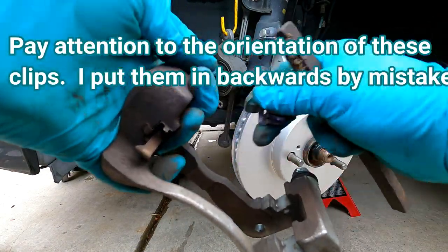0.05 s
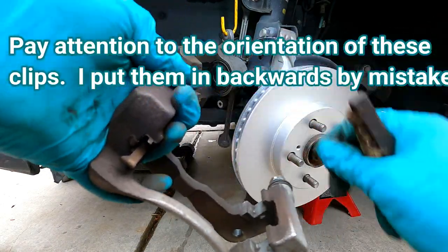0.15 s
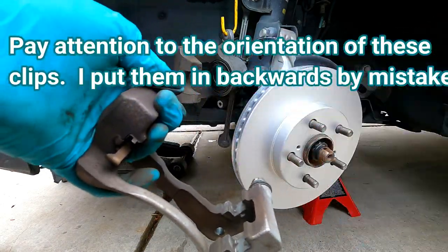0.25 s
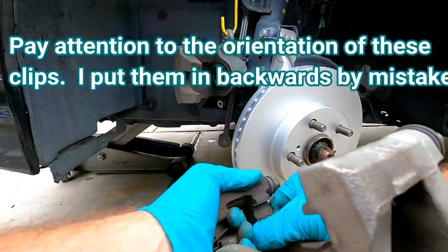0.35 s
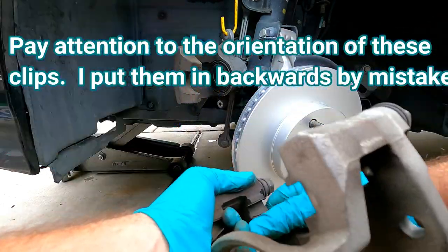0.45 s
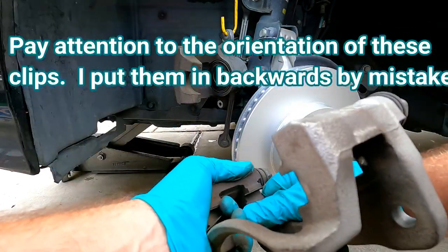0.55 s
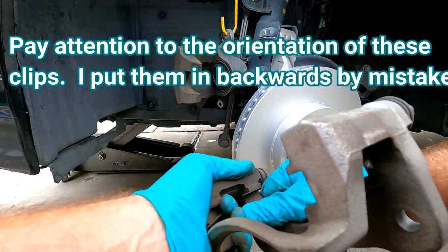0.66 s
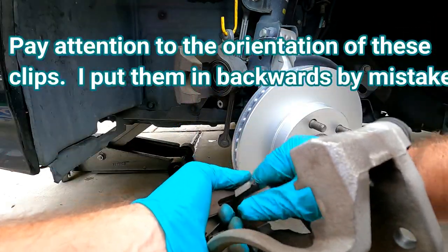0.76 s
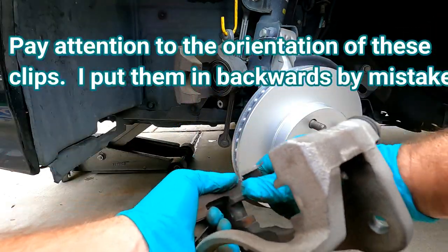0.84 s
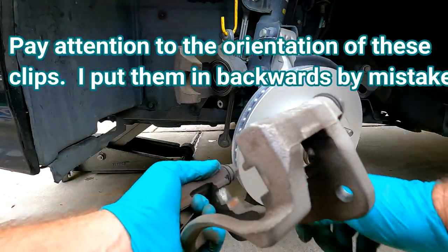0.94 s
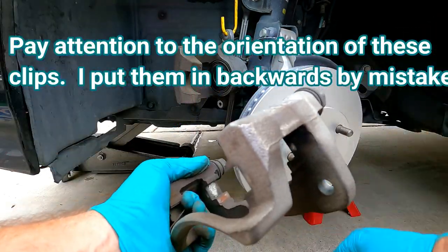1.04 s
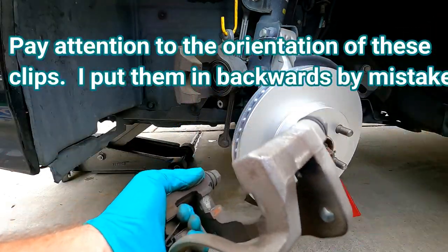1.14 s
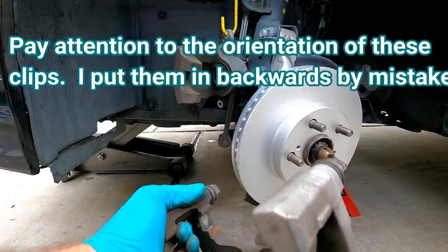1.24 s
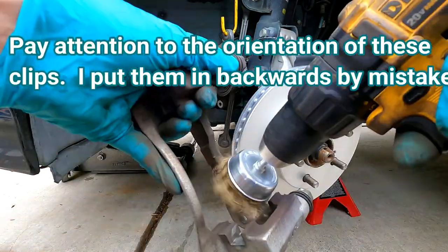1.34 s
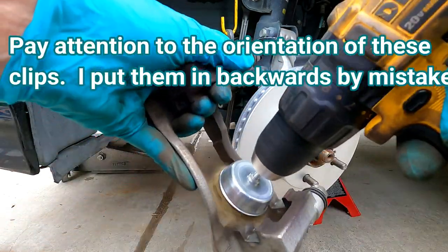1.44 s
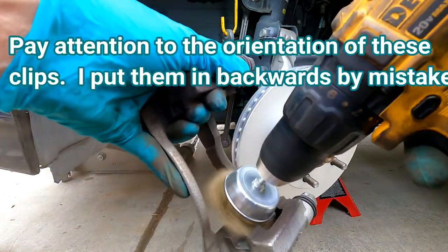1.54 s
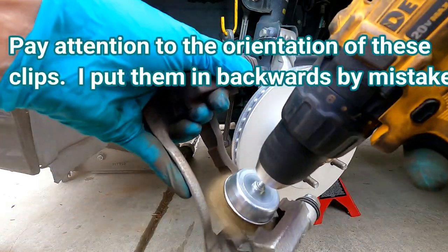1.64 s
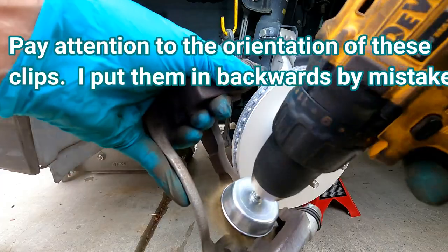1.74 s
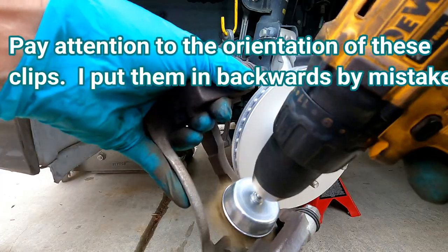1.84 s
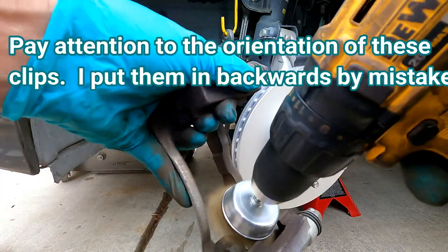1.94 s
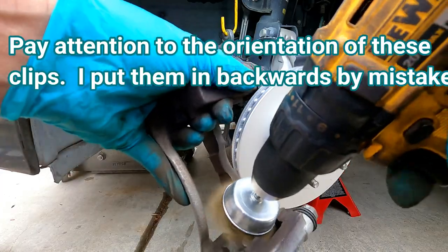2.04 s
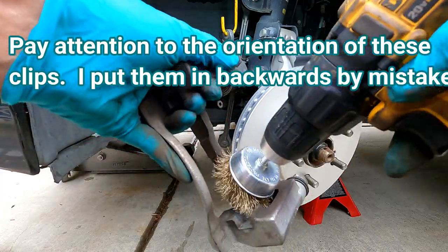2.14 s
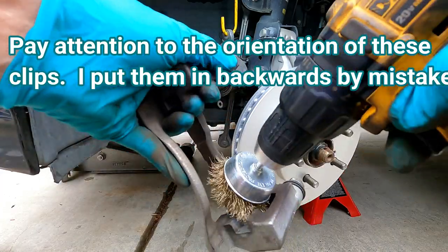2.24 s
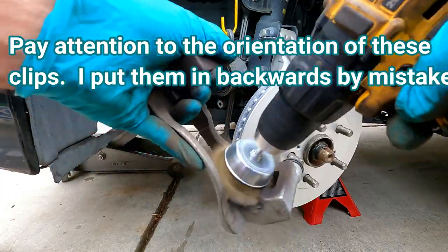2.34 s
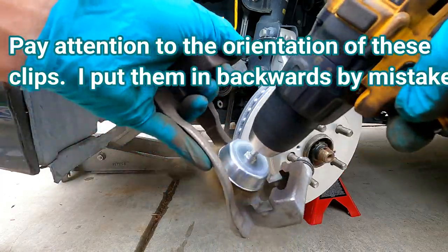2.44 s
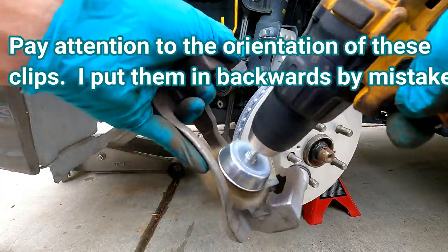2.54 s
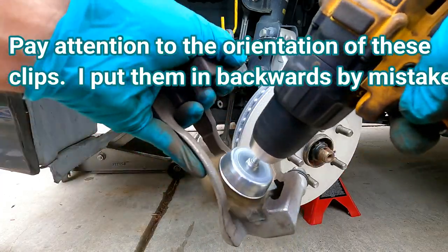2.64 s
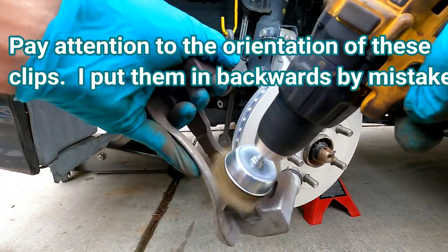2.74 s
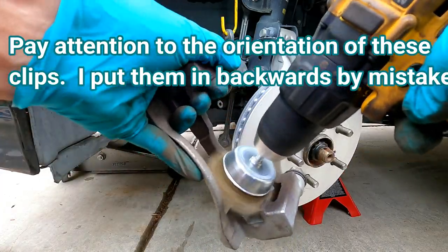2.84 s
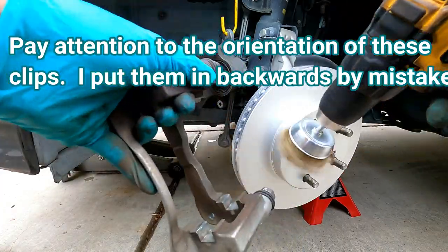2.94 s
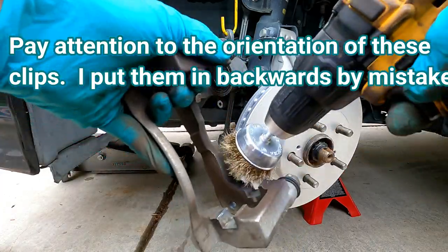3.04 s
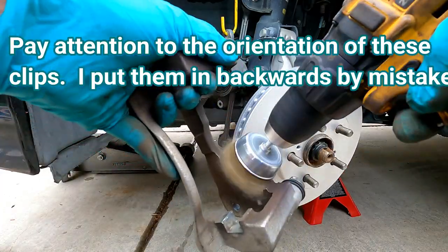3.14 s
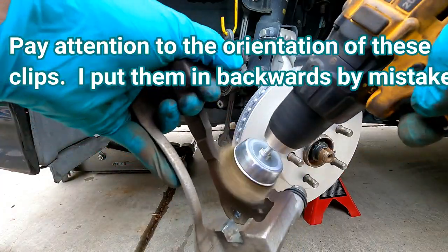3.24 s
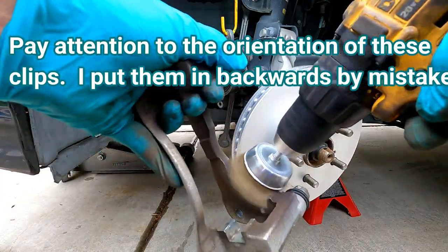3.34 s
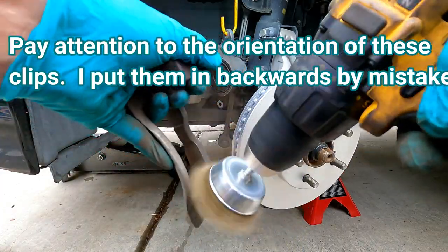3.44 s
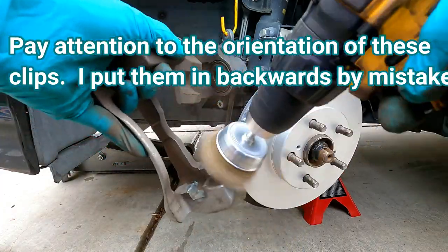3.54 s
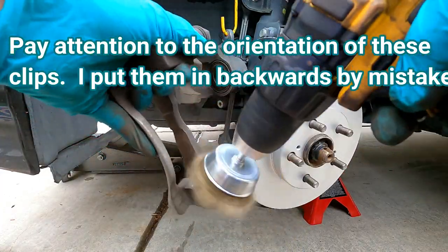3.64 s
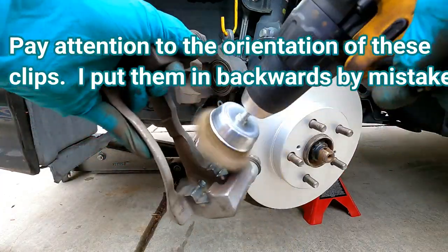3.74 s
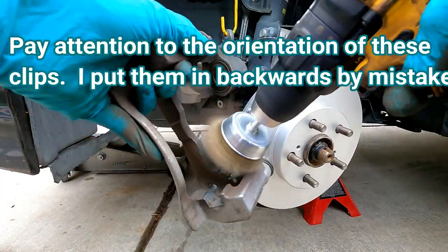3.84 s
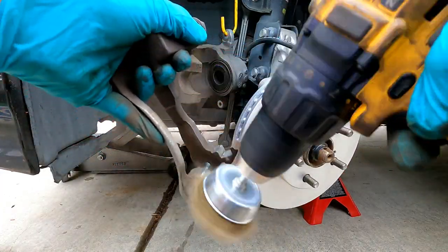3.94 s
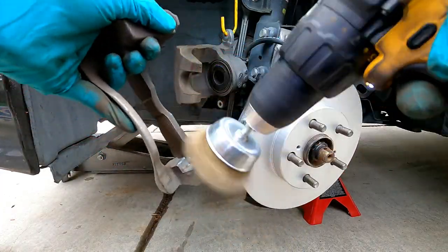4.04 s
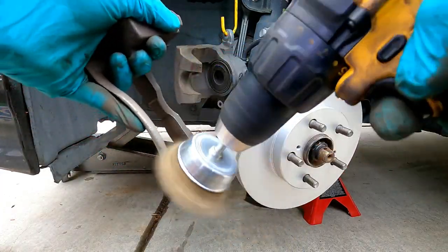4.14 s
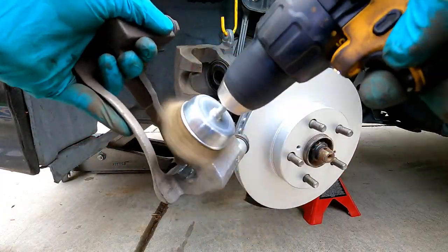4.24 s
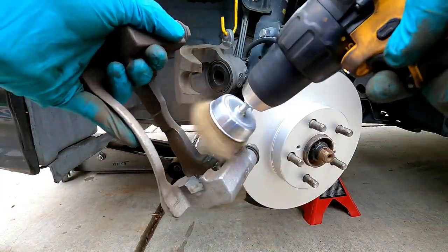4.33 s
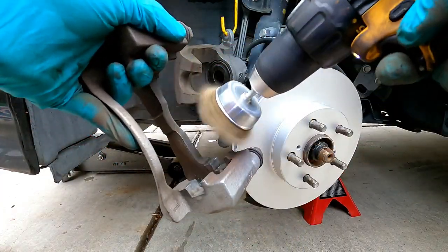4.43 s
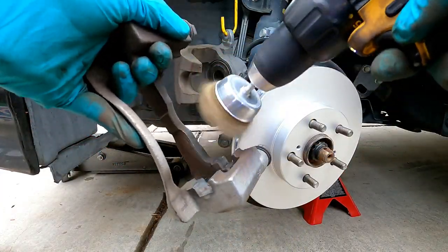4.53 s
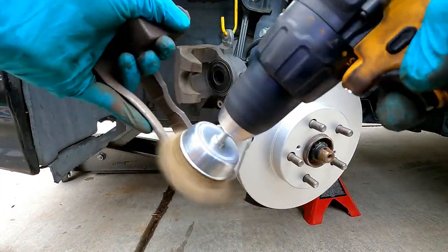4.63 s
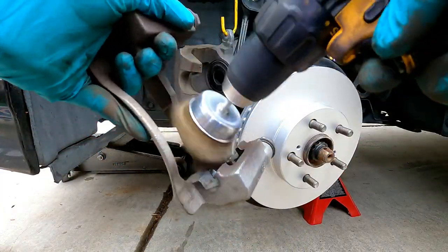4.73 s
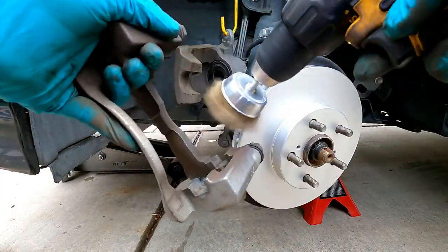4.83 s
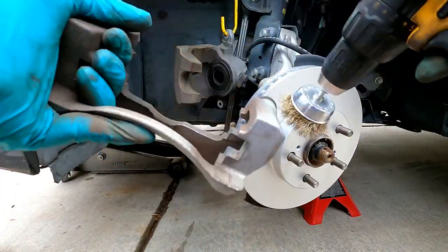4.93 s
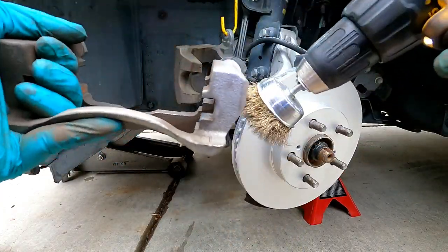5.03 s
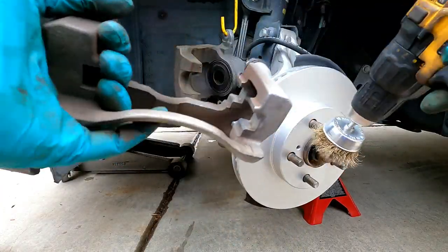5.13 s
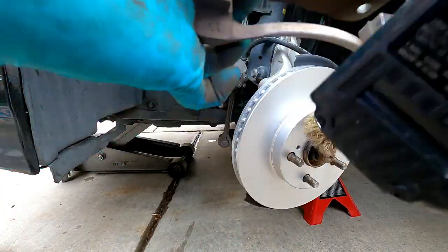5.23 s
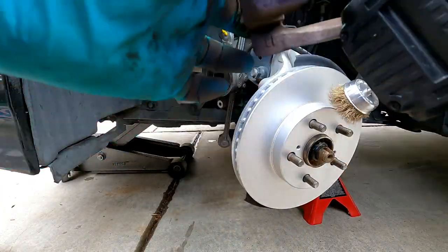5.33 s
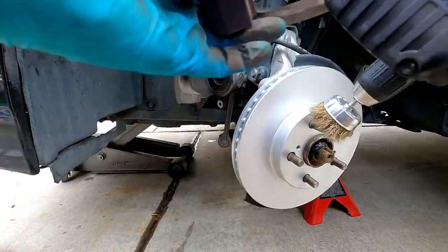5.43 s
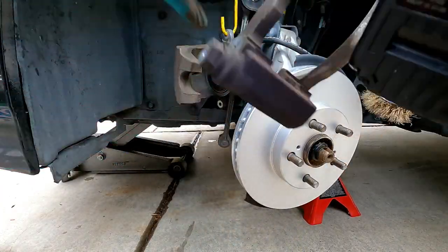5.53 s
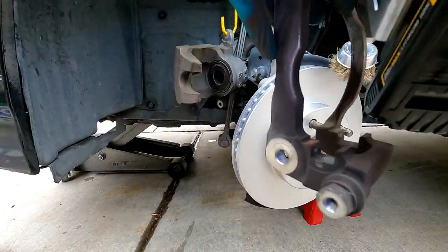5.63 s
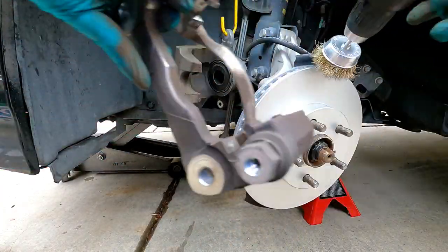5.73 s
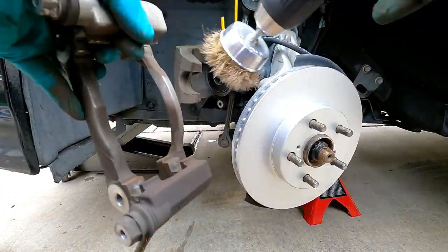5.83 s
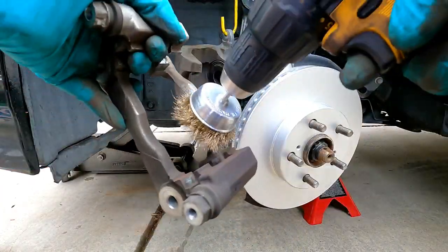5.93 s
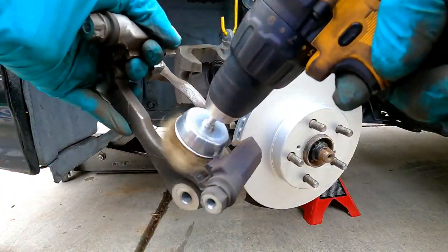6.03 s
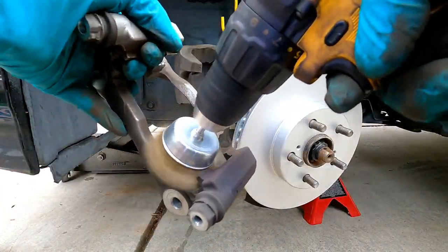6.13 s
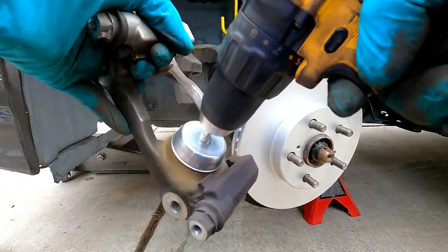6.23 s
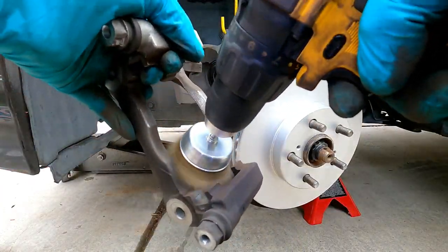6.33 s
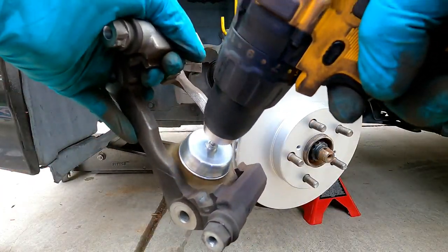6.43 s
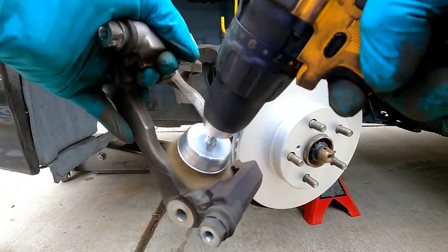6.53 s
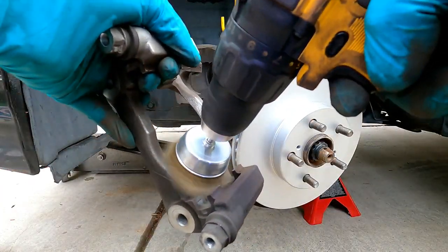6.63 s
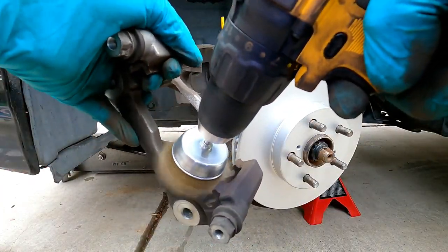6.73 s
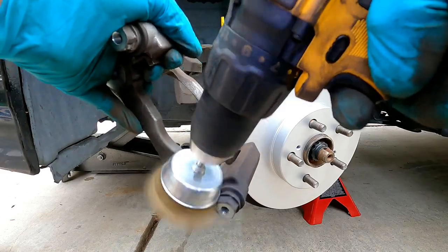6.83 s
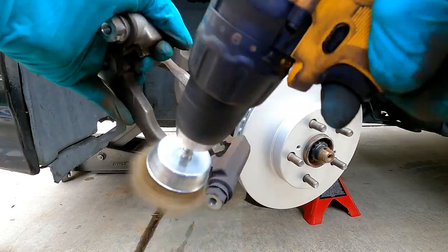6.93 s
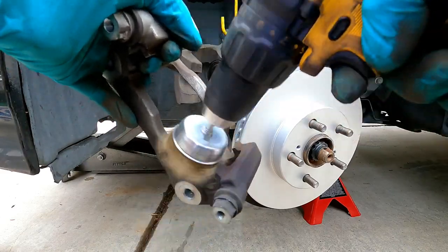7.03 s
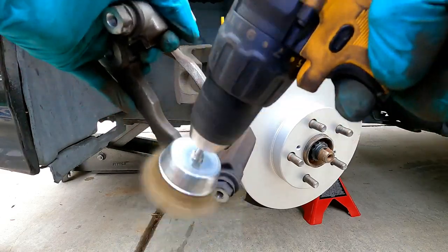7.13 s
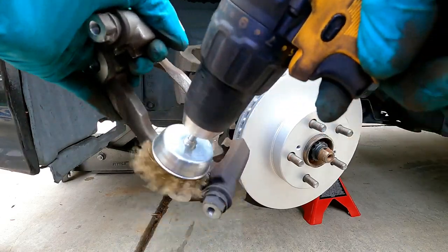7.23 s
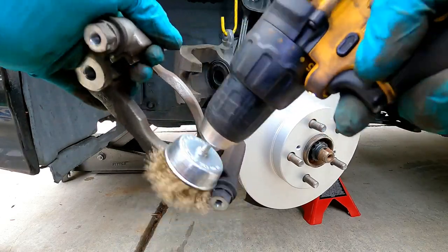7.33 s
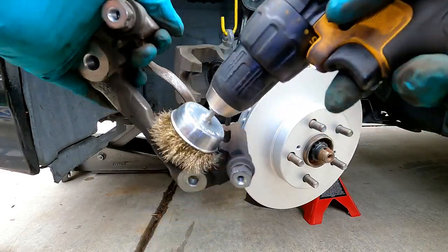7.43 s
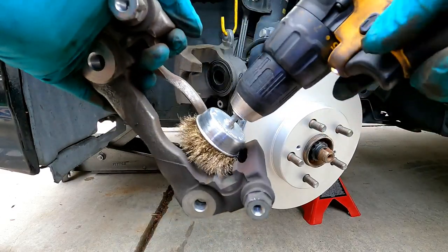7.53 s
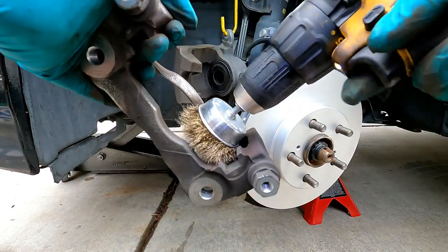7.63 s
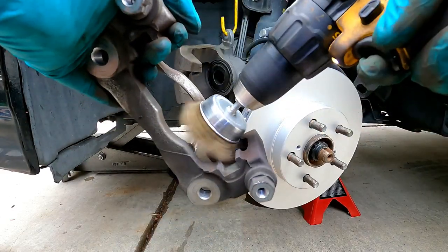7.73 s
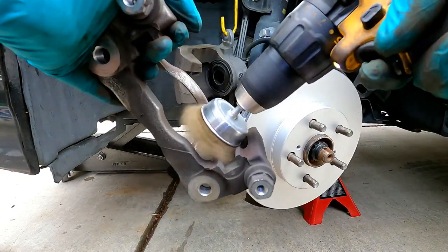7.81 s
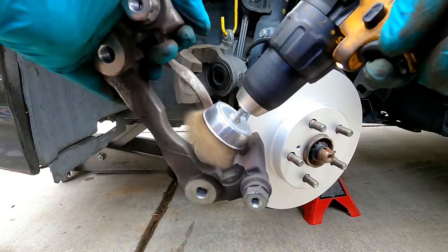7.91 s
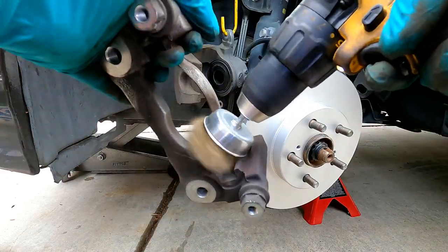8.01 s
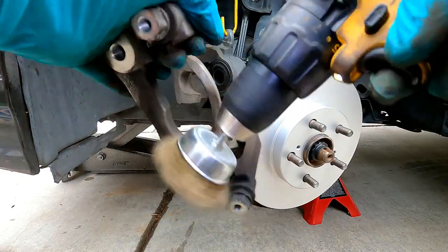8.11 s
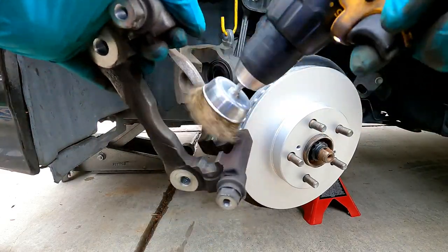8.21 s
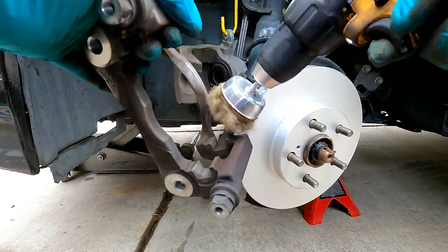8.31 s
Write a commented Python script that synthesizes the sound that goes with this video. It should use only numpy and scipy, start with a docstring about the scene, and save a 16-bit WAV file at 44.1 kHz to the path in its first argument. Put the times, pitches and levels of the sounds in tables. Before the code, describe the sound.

A cordless drill spins a wire brush against a steel part in five bursts, with scratchy scrubbing, motor whine and clinks between.

```python
"""Wire brush on cast steel

A cordless drill spins a wire cup brush against a steel bracket in five bursts, close to a small camera.
Bristle impacts excite the steel's resonances under the motor whine; between bursts the part clinks and
gloves rustle. At first an engine idles outside the garage; a low room rumble lasts throughout."""
import sys
import numpy as np
from scipy import signal
from scipy.fft import rfft, irfft, next_fast_len
from scipy.io import wavfile
from scipy.ndimage import uniform_filter1d

SR = 44100
rng = np.random.default_rng(int(sys.argv[2]) if len(sys.argv) > 2 else 0)


def pcm_store(signal):
    """Save signal as 16-bit PCM."""
    levels = np.round(np.clip(np.atleast_2d(signal), -1, 1) * 32767)
    wavfile.write(sys.argv[1], SR, levels.astype(np.int16).T)


N = 369028


def amp(db):
    """Amplitude ratio of a level in decibels."""
    return 10 ** (np.asarray(db) / 20)


def unit_rms(x):
    """Normalisation to unit power."""
    return x / np.sqrt(np.mean(x ** 2) + 1e-20)


def curve_at(points, hz):
    """Interpolation of a spectrum along a logarithmic frequency axis."""
    f, value = np.transpose(points)
    return np.interp(np.log(hz + 1), np.log(f + 1), value)


def span(start, end):
    """Sample times from start to end, in seconds."""
    return np.arange(round(start * SR), min(round(end * SR), N)) / SR


def add(mix, start, sound):
    """Superposition of a sound on the mix from its start time."""
    part = mix[round(start * SR):][:len(sound)]
    part += sound[:len(part)]


def fade(n, edge_s):
    """Trapezoidal envelope of n samples."""
    return np.clip(np.minimum(np.arange(n), np.arange(n)[::-1]) / (edge_s * SR), 0, 1)


def colour(x, gain):
    """Zero-phase filtering: the spectrum is multiplied by gain(hz)."""
    size = next_fast_len(len(x))
    return irfft(rfft(x, size) * gain(np.fft.rfftfreq(size, 1 / SR)), size)[:len(x)]


def band(x, lo_hz, hi_hz):
    """Band-pass filtering."""
    return signal.sosfilt(signal.butter(2, [lo_hz, hi_hz], "bandpass", fs=SR, output="sos"), x)


def wander(n, drift_s):
    """Smoothed noise of unit rms, correlated over about drift_s."""
    width = int(drift_s * SR)
    return unit_rms(uniform_filter1d(uniform_filter1d(rng.standard_normal(n), width), width))


def patchy(x, depth_db, frame):
    """Random modulation of the short-time spectrum; long frames give narrow, lasting rings."""
    spectrum = signal.stft(x, nperseg=frame)[2]
    patches = uniform_filter1d(rng.standard_normal(spectrum.shape), 4, axis=0)
    patches = unit_rms(uniform_filter1d(patches, 8, axis=1))
    return signal.istft(spectrum * amp(depth_db * patches), nperseg=frame)[1][:len(x)]


def grit(per_s, spread_db):
    """Shot noise: independent clicks, a few of them large."""
    size = amp(spread_db * np.minimum(rng.exponential(1, N), 5)) * rng.standard_normal(N)
    return size * (rng.random(N) < per_s / SR)


# Firing tones; the deepest follows IDLE_ENVELOPE instead: (frequency [Hz], level [dB])
FIRING_TONES = [(43.1, -54), (86.1, -51.5), (118.4, -53), (172.3, -49.5), (253.0, -54.5)]
# Spectrum of the engine's noise: (frequency [Hz], relative density [dB])
IDLE_SPECTRUM = [(15, -30), (25, -3), (168, -10), (209, -5), (345, -1), (456, -7.5), (1120, -20),
                 (3000, -24.5), (3900, -29), (6600, -120)]
# Course of the idle: (time [s], deepest tone [dB], noise [dB])
IDLE_ENVELOPE = [(0.0, -64, -49.5), (0.116, -60, -45.5), (0.294, -61, -56), (0.37, -52, -45.5),
                 (0.458, -65, -44), (0.79, -56, -45.5), (1.336, -58, -45.5), (1.36, -42, -49)]


def engine():
    """Periodic firing gives a line spectrum, here wavering over uneven broadband noise."""
    times, deep_db, noise_db = np.transpose(IDLE_ENVELOPE)
    t = span(0, times[-1])
    n = len(t)
    noise = colour(rng.standard_normal(n), lambda hz: amp(curve_at(IDLE_SPECTRUM, hz)))
    out = amp(np.interp(t, times, noise_db)) * noise / np.std(band(noise, 160, 1000))
    for k, (hz, db) in enumerate(FIRING_TONES):
        cycles = np.cumsum(hz * (1 + 0.0125 * wander(n, 0.053))) / SR + rng.random()
        level_db = (db if k else np.interp(t, times, deep_db)) + 3.3 * wander(n, 0.072)
        out += np.sqrt(2) * amp(level_db) * np.sin(2 * np.pi * cycles)
    fade_out = fade(n + 400, 0.0085)[400:]
    return np.pad(out * fade_out, (0, N - n))


# Spectrum of the garage's rumble: (frequency [Hz], relative density [dB])
RUMBLE_SPECTRUM = [(15, -66), (25, -43), (102, 0), (143, -4.5), (237, -0.5), (439, -9), (468, -29),
                   (510, -13), (4000, -30), (5200, -88), (8800, -120)]
# Course of the rumble: (time [s], level [dB])
RUMBLE_ENVELOPE = [(0, -45.5), (2.2, -71.5), (2.4, -57.5), (5, -61), (5.7, -52), (8.37, -56.5)]


def room_rumble():
    """Ambient noise with its power at low frequencies; random modulation makes it lumpy."""
    rumble = colour(rng.standard_normal(N), lambda hz: amp(curve_at(RUMBLE_SPECTRUM, hz)))
    level_db = np.interp(np.arange(N) / SR, *np.transpose(RUMBLE_ENVELOPE))
    return amp(level_db) * unit_rms(patchy(rumble, depth_db=2.2, frame=512))


# Spectrum of glove friction: (frequency [Hz], relative density [dB])
FRICTION_SPECTRUM = [(410, -2.5), (700, 0), (986, -3), (2400, 2), (4180, -1), (4750, -4.5), (4930, -2),
                     (9190, -26), (11500, -19), (14500, -34)]
# Steady crackle as the part is turned by hand: (start [s], end [s], level [dB], treble gain [dB])
TURNINGS = [(0, 1.372, -57, 4), (2.24, 2.383, -73, 0), (3.108, 3.16, -70, 1), (4.992, 6.097, -75.5, 8.5),
            (7.34, 7.79, -70, 8), (7.338, 7.374, -57.5, 5), (7.405, 7.47, -50, -7)]
# Single rubs: (start [s], loudest [s], end [s], level [dB], treble gain [dB])
RUBS = [(0, .06, 0.18, -40, 9), (0.507, .65, .8, -52, 11), (2.27, 2.283, 2.3, -55, 3),
        (3.135, 3.143, 3.2, -47, -8), (5.153, 5.25, 5.36, -61, 8.5), (5.486, 5.5, 5.53, -44, -3),
        (5.45, 5.547, 5.6, -51, 11.5), (5.61, 5.687, 5.9, -58, 7), (5.69, 5.847, 5.95, -55.5, 11.5),
        (6.006, 6.103, 6.12, -49, -2), (7.457, 7.62, 7, -59, 5), (7.664, 7.76, 7.85, -58, 5)]


def gloves():
    """Friction of rubber on cast steel makes a fine crackle; overlapping rubs add in power."""
    clicks = grit(per_s=9000, spread_db=1.5) * amp(1.8 * wander(N, 0.007))
    crackle = colour(clicks, lambda hz: amp(curve_at(FRICTION_SPECTRUM, hz)))
    crackle = patchy(crackle, depth_db=2, frame=512) / np.std(band(crackle, 680, 7500))
    high = colour(crackle, lambda hz: 1 / (1 + (5500 / (hz + 1)) ** 6))
    body_power, treble_power = np.zeros(N), np.zeros(N)
    for start, end, db, treble_db in TURNINGS:
        held = amp(db) * fade(len(span(start, end)), 0.0044)
        add(body_power, start, held ** 2)
        add(treble_power, start, (held * amp(treble_db)) ** 2)
    for start, loudest, end, db, treble_db in RUBS:
        t = span(start, end)
        swell_db = np.interp(t, [start, loudest, end], [-26.5, 0, -26.5])
        rub = amp(db + swell_db) * fade(len(t), 0.002)
        add(body_power, start, rub ** 2)
        add(treble_power, start, (rub * amp(treble_db)) ** 2)
    return np.sqrt(body_power) * (crackle - high) + np.sqrt(treble_power) * high


# Close modes of a struck spot: (frequency / ring frequency [ratio], amplitude [ratio])
MODES = [(.9, .45), (1, 1), (1.09, .6), (1.68, .4)]


def impact(ring_hz, ring_db, treble_db, decay_s, thud_db):
    """Impulsive excitation: a scrape of grit, freely decaying metal modes and a thud through the hand."""
    t = np.arange(3500) / SR
    noise = rng.standard_normal(len(t))
    onset = 1 - np.exp(-(t / (0.24 * decay_s)) ** 2)
    envelope = onset * (np.exp(-t / decay_s) + 0.0085 * np.exp(-t / 0.0096))
    hiss = colour(noise[::-1], lambda hz: amp(curve_at(FRICTION_SPECTRUM, hz)))
    scrape = unit_rms(band(noise, 560, 4350)) + amp(treble_db) * unit_rms(band(hiss, 8200, 17000))
    modes = sum(share * np.sin(2 * np.pi * ring_hz * ratio * t + phase)
                for (ratio, share), phase in zip(MODES, 6 * noise))
    ring = modes * onset * np.exp(-t / (1.2 * decay_s))
    thud = 5.8 * band(np.sin(2 * np.pi * 280 * t) * np.exp(-t / 0.0015), 155, 2200)
    return amp(-14.5) * (scrape * envelope + amp(ring_db) * ring + amp(thud_db) * thud)


# Knocks of the part:
# (time [s], gain [dB], ring [Hz], ring gain [dB], treble gain [dB], decay [s], thud gain [dB])
CLINKS = [(.0154, -15.5, 2830, -1, 4, 0.0043, -19), (0.042, -18, 5400, -1, -17, 0.0069, -16),
          (0.0497, -22, 5700, 4, 15.5, 0.0063, -13), (.1, -22.5, 2420, 1, -1, 0.0087, -19),
          (0.4164, -23.5, 5100, -4, -29, 0.0071, -13), (.4374, -27.5, 5500, -8, -15, 0.0089, -8),
          (0.632, -30, 3430, -4, -6, 0.015, -5), (0.7904, -25.5, 2430, 1, -40, 0.016, -13),
          (0.886, -29.5, 2400, -8, 5, 0.0062, -10), (0.922, -17, 3300, -6, -7, 0.0084, -14),
          (.9323, -23.5, 4240, -4, -0.5, 0.019, -10), (1.0054, -33, 3200, -4, 4, 0.016, -8),
          (1.05, -29, 3010, -1, 3.5, 0.0082, -11), (1.233, -16.5, 3890, 1.5, -28, 0.0069, -15),
          (3.14, -27, 2190, -1, -12, .0051, -19), (5.1542, -25.5, 2210, 6, -31, 0.0027, -17),
          (5.3292, -10.5, 2620, -0.5, -34, 0.0064, -13), (5.3386, -11.5, 1430, -3, -13, 0.0052, -14),
          (5.3464, -10, 2020, 1, -16, 0.0028, -7.5), (5.5016, -24, 2450, 14, -27, .0058, -21),
          (5.555, -35, 2200, 0, -18, .0046, -6), (5.666, -28, 1290, 4, -28, 0.0073, -7),
          (7.4617, -14.5, 3520, -7, -24, 0.0052, -22), (7.652, -13, 2250, 1, -7, 0.0034, -19),
          (7.676, -20.5, 1900, 4.5, 6.5, 0.0025, -28)]


def clinks():
    """Free vibration of the knocked bracket: each spot has its own pitch and damping."""
    out = np.zeros(N)
    for start, db, *timbre in CLINKS:
        add(out, start, amp(db) * impact(*timbre))
    return out


# Brush on steel: (start [s], end [s], gain [dB], rise [s], fall [s],
# first treble gain [dB], last treble gain [dB], shaking of the drill body [dB])
CONTACTS = [(1.35, 2.245, -33.5, 0.22, .12, -1, -2, -13.5),
            (2.378, 3.106, -33, .012, 0.015, -2.5, -0.5, -13),
            (3.163, 4.985, -32.5, .025, 0.02, -3.5, -4.5, -15.5),
            (6.105, 7.345, -32, 0.023, 0.014, -3, -3.5, -15),
            (7.781, 8.368, -33.5, 0.0069, 0.072, -4.5, -6, -15.5)]
# The hand leans or eases off: (middle [s], duration [s], level change [dB], treble change [dB])
PRESSURE_CHANGES = [(1.375, 0.12, 4.5, -8), (1.507, 0.096, 2.5, 1), (2.084, 0.44, 2.5, 0),
                    (3.644, 0.17, -1, -1), (4.12, 0.1, 0, -1), (4.69, 0.037, 3, 4),
                    (3.022, 0.19, -4.5, -3.5), (3.78, 0.14, -6.5, 2.5), (4.606, 0.24, -1.5, 0),
                    (4.78, 0.11, -1, -1), (4.854, 0.076, 3, -0.5), (4.95, .1, -2.5, -1.5),
                    (7.106, 0.15, -3.5, 0), (7.29, 0.03, -0.5, -2.5), (7.317, 0.053, -10.5, 2),
                    (7.852, 0.13, 3, -0.5), (8.302, .03, -4, 0)]
# Spectrum of the scrubbing: (frequency [Hz], relative density [dB])
SCRUB_SPECTRUM = [(47, -27), (80, -19.5), (253, -5.5), (508, -12), (857, -3), (1320, -10.5), (2230, -4.5),
                  (3090, -5), (3530, -3), (3760, -7), (6340, -16), (9180, -30.5), (11900, -22.5),
                  (14500, -53.5)]
# Resonances of bracket, cup and housing, which vary with the spot being brushed:
# (frequency [Hz], bandwidth [Hz], then the gain in each of the five contacts [dB])
RESONANCES = [(840, 30, 8.5, 2, -5, 7.9, -21), (1106, 225, 8.5, 2, 4.5, 6, 3),
              (1650, 210, 13.5, 7.5, 2.5, 7.2, 5.5), (2080, 210, 10.5, 5.5, 4.5, 7, -4),
              (2275, 160, -10, 7, 6, 5.7, 2), (4064, 200, 8.5, 4, 1.5, 6.1, -13),
              (4880, 230, 5, 4.5, 0.5, 2.5, -16), (5360, 280, -3.5, 1.5, -21, 5.8, -1),
              (7160, 170, 5, 1, -5, 1.5, -9)]


def wire_brush():
    """Random forcing of resonators: bristles flick the steel, and pressure sets level and brightness."""
    flicks = unit_rms(grit(per_s=14000, spread_db=0.5)) * amp(0.47 * wander(N, 0.0071))
    first_touch = 0.17  # share of full pressure
    out = np.zeros(N)
    for k, (start, end, level_db, rise, fall, first_db, last_db, shake_db) in enumerate(CONTACTS):
        t = span(start, end)
        level_db = level_db + 0.9 * wander(len(t), 0.082)
        tilt_db = np.interp(t, [start, end], [first_db, last_db])
        for middle, length, db, treble_db in PRESSURE_CHANGES:
            lean = np.cos(np.pi * np.clip((t - middle) / length, -0.5, 0.5)) ** 2
            level_db, tilt_db = level_db + db * lean, tilt_db + treble_db * lean
        pressure = np.minimum(first_touch + (1 - first_touch) * (t - start) / rise, 1)
        pressure *= np.minimum((end - t) / fall, 1)

        def response(hz):
            """Resonance peaks add in power and lift the scrubbing spectrum."""
            peaks = sum(amp(gains_db[k]) ** 2 / (1 + (2 * (hz - centre) / width) ** 2)
                        for centre, width, *gains_db in RESONANCES)
            return amp(curve_at(SCRUB_SPECTRUM, hz)) * np.sqrt(1 + peaks)

        steel = colour(flicks[round(start * SR):][:len(t)], response)
        steel = patchy(patchy(steel, depth_db=1.5, frame=512), depth_db=1.5, frame=2048)
        low = colour(steel, lambda hz: 1 / (1 + (hz / 550) ** 6))
        high = colour(steel, lambda hz: 1 / (1 + (4500 / (hz + 1)) ** 6))
        scrub = (steel - low - high) / np.std(band(steel, 600, 2740))
        hiss = amp(tilt_db) * high / np.std(band(high, 4200, 13000))
        shake = amp(shake_db + 1.5 * wander(len(t), 0.024)) * unit_rms(low)
        add(out, start, amp(level_db - 2.12) * pressure * (scrub + hiss + shake) * fade(len(t), 0.002))
    return out


def tone(hz, level_db, jitter, flutter_db):
    """Random frequency and amplitude modulation of a sine: the pitch shivers and the level dips."""
    n = len(hz)
    shiver = jitter * (wander(n, 0.0028) + wander(n, 0.0165))
    cycles = np.cumsum(hz * (1 + shiver)) / SR + rng.random()
    dip_db = flutter_db * np.maximum(wander(n, 0.0082), -0.5) ** 2
    return np.sqrt(2) * amp(level_db - dip_db) * np.sin(2 * np.pi * cycles) * fade(n, 0.0003)


# Pulls of the trigger: (press [s], release [s], stop [s], first rotor speed [Hz], full speed [Hz],
# spin-up time constant [s], deceleration [Hz/s], whine [dB], hum [dB])
TRIGGER_PULLS = [(1.406, 1.88, 1.892, 181, 345, .045, 50, -43, -49),
                 (1.892, 2.135, 2.2, 412, 437, 0.018, 2090, -32.5, -46.5),
                 (2.38, 2.934, 3.04, 260, 434.4, 0.029, 217, -31.5, -68),
                 (3.166, 3.589, 3.68, 348.6, 438.4, .025, 708, -31, -63),
                 (3.773, 4.688, 4.79, 350.6, 441.9, 0.032, 647, -30.5, -68),
                 (4.807, 4.907, 4.93, 359.4, 449, 0.034, 2010, -28.5, -54),
                 (6.109, 7.004, 7.08, 298.7, 442, .075, 1080, -29.5, -58),
                 (7.175, 7.27, 7.315, 385, 442.6, .012, 1800, -28, -63),
                 (7.779, 8.265, 8.298, 332, 445.2, .03, 910, -27.5, -51.5)]
# Pitch shiver at full speed, one per pull: (relative deviation [ratio])
PULL_JITTER = [.006, .0015, .005, .0045, .004, .005, .0022, .003, .0022]
# Upper tone under power, one per pull: (level [dB])
POWERED_UPPER_DB = [-41, -56, -54, -51, -52, -56, -54, -58, -55]
# The load drags the rotor or smothers the whine: (start [s], duration [s], speed loss [Hz], loss [dB])
LOAD_SNAGS = [(2.657, 0.21, 1.1, 12), (3.548, 0.039, 3, 11), (4.057, 0.15, 0.84, 19),
              (4.238, 0.12, 1.37, 4.5), (4.427, .12, 1, 4.5), (3.192, .04, 9.3, -4.5),
              (3.821, 0.0349, 11.9, -2), (4.84, .036, 21, -1), (6.106, 0.19, 19, 7),
              (6.424, 0.0426, 11.7, 1.5), (6.531, 0.068, 5.6, -2), (7.779, .11, 3.7, 9),
              (8.163, .03, 13.6, 5), (8.228, .02, 6, 3)]
# Response of the resonant housing: (frequency [Hz], gain [dB])
HOUSING_RESPONSE = [(2300, -8), (3000, -7), (3200, -3), (3350, -1), (3520, 0), (3750, 8), (3950, 15),
                    (4100, 10), (4220, -10), (4600, -14)]
# Weaker rotor and gear tones: (frequency / whine frequency [ratio], level [dB])
GEAR_TONES = [(.25, -52), (.5, -53), (1.551, -53), (2.001, -61), (3.001, -70)]


def motor():
    """Rotational orders: hum, whine and gear tones track the rotor as it spins up, holds and slows."""
    whine_order, upper_order = 8, 10  # cycles per turn
    out = np.zeros(N)
    for pull, jitter, powered_db in zip(TRIGGER_PULLS, PULL_JITTER, POWERED_UPPER_DB):
        start, release, stop, from_hz, full_hz, spin_up, slowing, whine_db, hum_db = pull
        t = span(start, stop)
        coast_loss_hz = slowing * np.maximum(t - release, 0)
        rotor_hz = full_hz - (full_hz - from_hz) * np.exp((start - t) / spin_up) - coast_loss_hz
        braking = slowing / 1000  # harder braking cuts whine and hum sooner and lifts the upper tone
        coast_loss_db = 0.12 * braking * coast_loss_hz
        whine_db, hum_db = whine_db - coast_loss_db, hum_db - coast_loss_db
        upper_db = np.where(t < release, powered_db, -50 + 5.5 * braking)
        for onset, length, lost_hz, lost_db in LOAD_SNAGS:
            load = np.clip(np.minimum(t - onset, onset + length - t) / 0.0086 + 0.5, 0, 1)
            rotor_hz, whine_db = rotor_hz - lost_hz * load, whine_db - lost_db * load
        jitter = jitter + 0.05 * abs(1 - rotor_hz / full_hz)  # less steady below full speed
        whine_hz, upper_hz = whine_order * rotor_hz, upper_order * rotor_hz
        housing_db = curve_at(HOUSING_RESPONSE, whine_hz)
        upper_db += curve_at(HOUSING_RESPONSE, upper_hz)
        add(out, start, tone(whine_hz, whine_db + housing_db, jitter, flutter_db=1 + 500 * jitter))
        add(out, start, tone(upper_hz, upper_db, jitter=0.009, flutter_db=3))
        add(out, start, tone(rotor_hz, hum_db, jitter=0.018, flutter_db=3))
        for ratio, db in GEAR_TONES:
            add(out, start, tone(whine_hz * ratio, db + housing_db, jitter / 2, flutter_db=2))
    return out


# Squeals of the drill: (start [s], duration [s], first pitch [Hz], last pitch [Hz], level [dB])
SQUEAL_GLIDES = [(1.43, .025, 3950, 4350, -39), (1.485, .035, 4000, 4750, -31.5),
                 (2.185, .027, 4100, 3950, -40), (2.385, .03, 3600, 4100, -34),
                 (3.79, .03, 3700, 4250, -33), (6.115, .07, 3800, 4400, -31), (7.318, .02, 4170, 3800, -31),
                 (7.785, .035, 3850, 4050, -35)]


def squeals():
    """Linear frequency sweeps, heard briefly as the drill starts and stops."""
    out = np.zeros(N)
    for start, length, from_hz, to_hz, db in SQUEAL_GLIDES:
        glide_hz = np.linspace(from_hz, to_hz, round(length * SR))
        add(out, start, tone(glide_hz, db, jitter=0.016, flutter_db=2.5))
    return out


# Blows in the chuck: (time [s], gain [dB], ring [Hz], thud gain [dB])
CHUCK_BLOWS = [(3.0589, -10.5, 3300, -15), (3.0779, -16, 2110, -25), (3.0917, -16.5, 1970, -16),
               (4.9137, -13, 2330, -6.5), (4.92, -13, 2420, -14), (4.9357, -9, 2160, -16),
               (4.9665, -10.5, 3430, -12), (6.1118, -14.5, 3880, -6), (7.3367, -13, 2010, -16),
               (8.163, -21, 3530, -5), (8.1685, -18, 3510, -5), (8.176, -24, 3400, -3),
               (8.191, -20, 3400, -7), (8.2485, -22, 3660, -4), (8.306, -8, 3400, -12),
               (8.331, -13, 2370, -27)]


def chuck_clacks():
    """Heavily damped impacts of the chuck and its lock as the drill starts, snags or brakes."""
    out = np.zeros(N)
    for start, db, hz, thud_db in CHUCK_BLOWS:
        add(out, start, amp(db) * impact(hz, ring_db=1.5, treble_db=-20, decay_s=0.0025, thud_db=thud_db))
    return out


# Left-right difference against the centre: (frequency [Hz], relative gain [dB])
SIDE_SPECTRUM = [(60, -40), (150, -37), (380, -31), (950, -39.5), (2380, -50.5), (5980, -36.5), (15000, 3)]


def stereo_width(centre):
    """Decorrelation: a random-phase left-right difference, mainly in the treble, gives slight width."""
    hz, _, spectrum = signal.stft(centre, SR, nperseg=512)
    random_phase = np.exp(2j * np.pi * rng.random(spectrum.shape))
    gain = amp(curve_at(SIDE_SPECTRUM, hz) + 3)[:, None]
    side = signal.istft(spectrum * random_phase * gain, SR, nperseg=512)[1][:N]
    return np.array([centre + side, centre - side])


def scene():
    """Linear superposition of all sources, spread over two channels."""
    drill = wire_brush() + motor() + squeals()
    return stereo_width(drill + clinks() + chuck_clacks() + gloves() + engine() + room_rumble())


def record(dry):
    """Linear filtering: a narrow microphone notch near 9 kHz; the top treble is dulled, then cut off."""
    notch_db = lambda hz: -22 / (1 + ((hz - 9060) / 68.6) ** 2)
    shelf_db = lambda hz: -20 / (1 + np.exp((13650 - hz) / 150))
    heard = np.array([colour(x, lambda hz: amp(notch_db(hz) + shelf_db(hz))) for x in dry])
    lowpass = signal.firwin(511, 15600, window=("kaiser", 9), fs=SR)
    return signal.oaconvolve(heard, lowpass[None], "same")


dry = scene()
out = record(dry)
pcm_store(out)
```